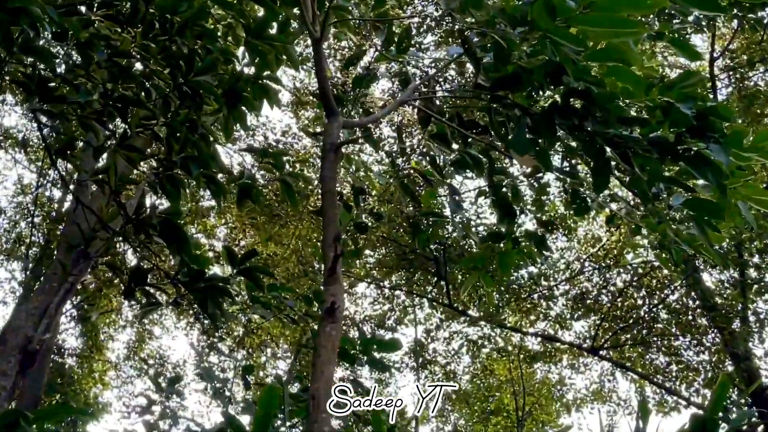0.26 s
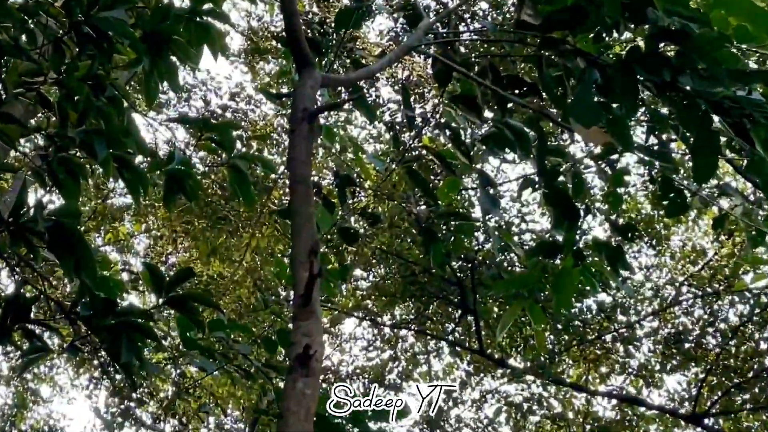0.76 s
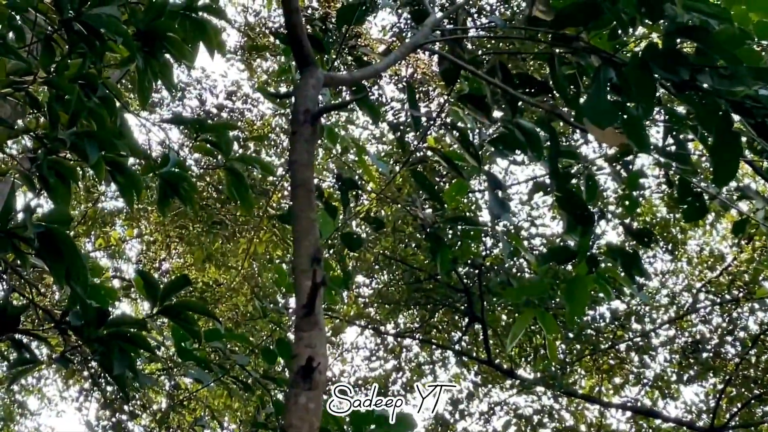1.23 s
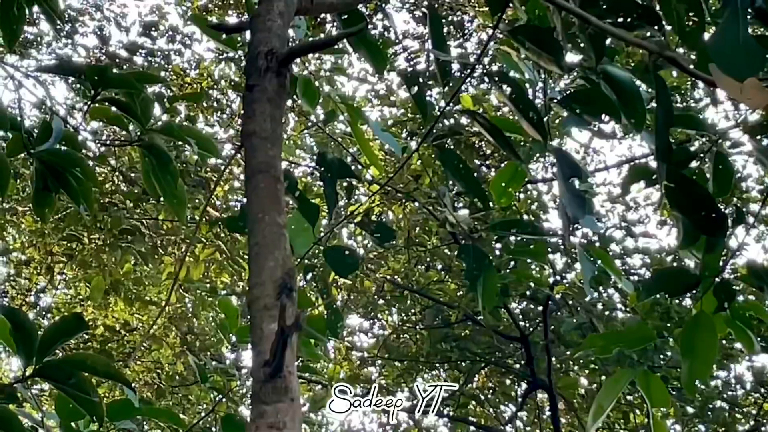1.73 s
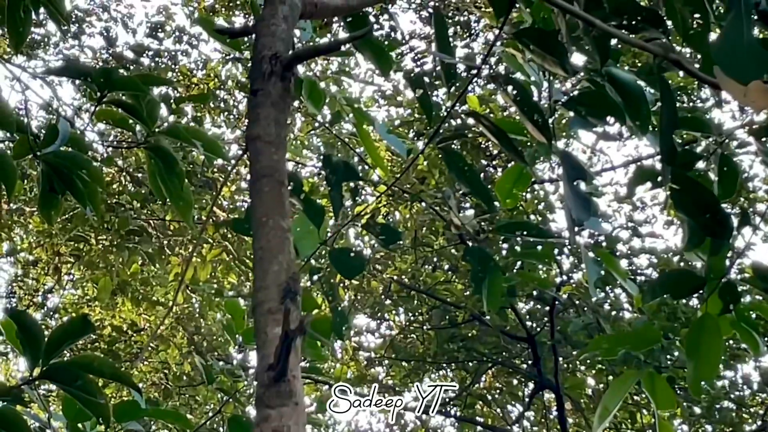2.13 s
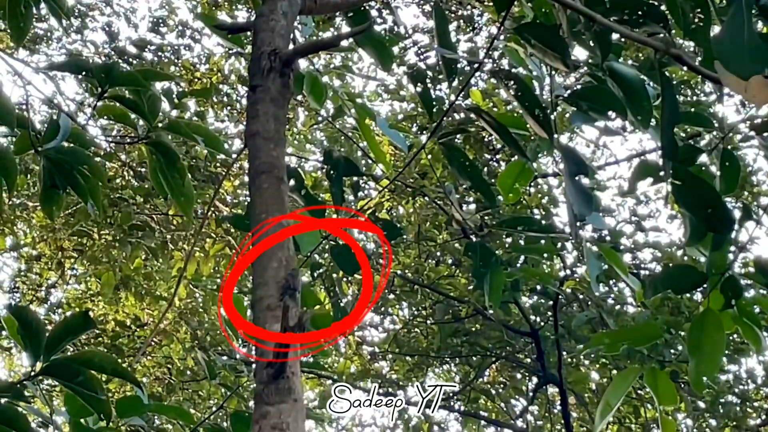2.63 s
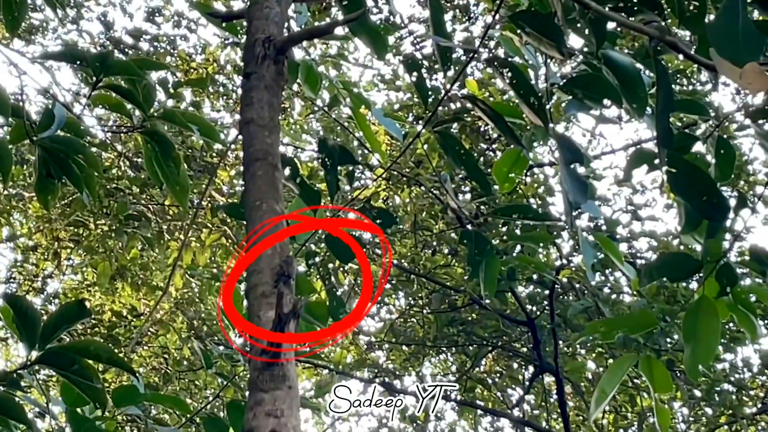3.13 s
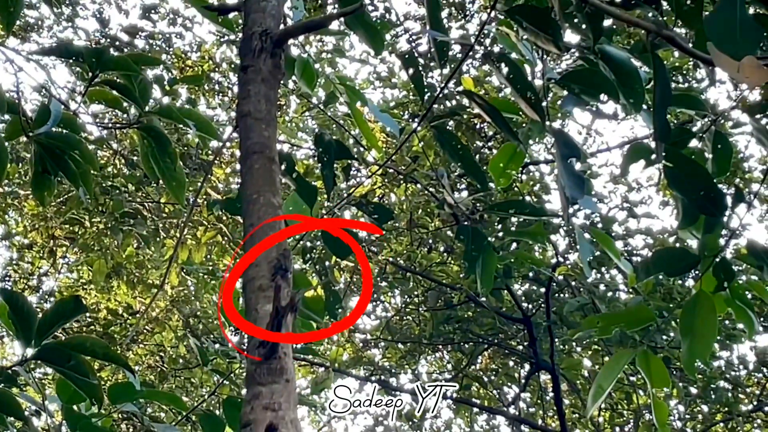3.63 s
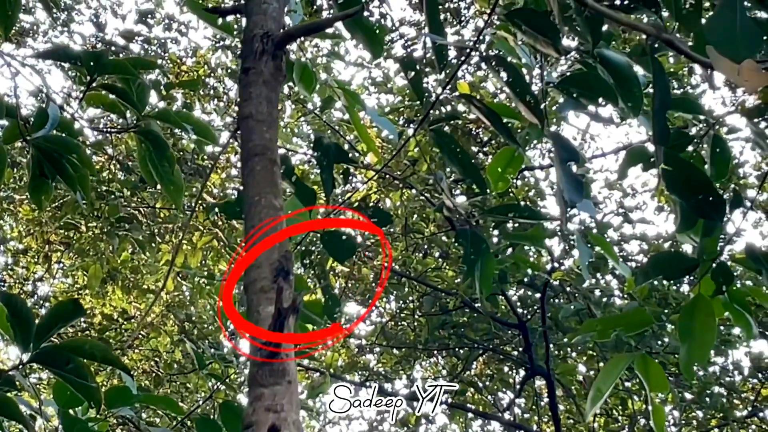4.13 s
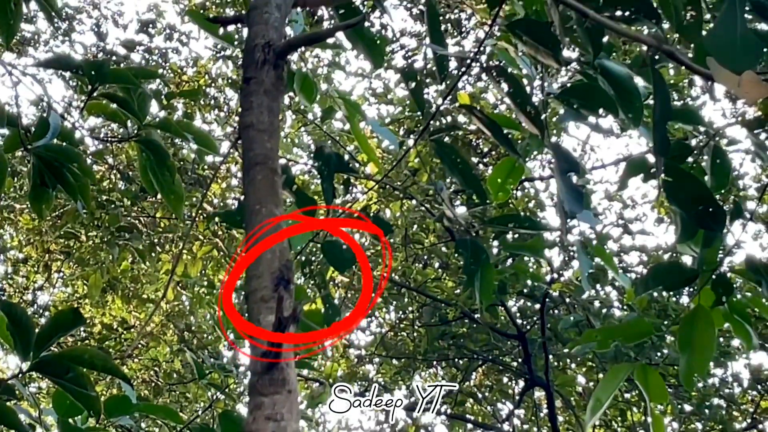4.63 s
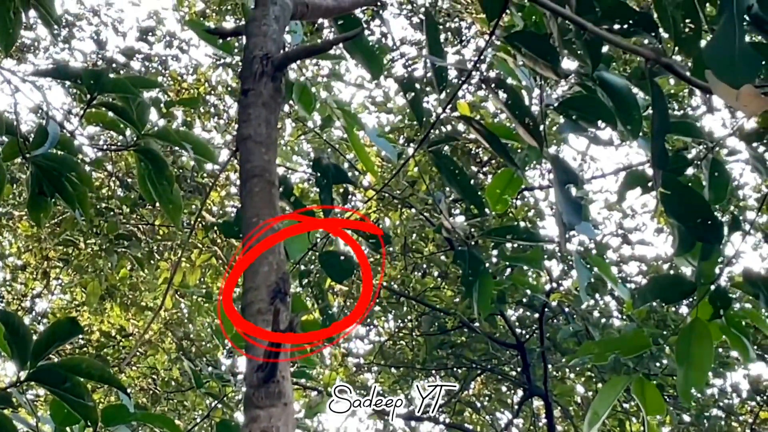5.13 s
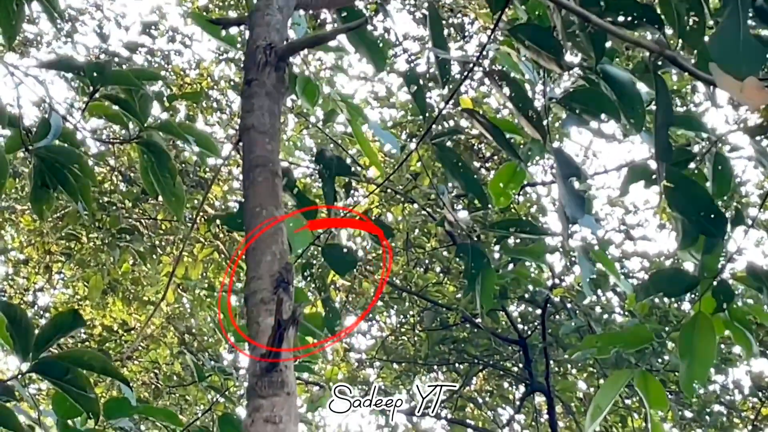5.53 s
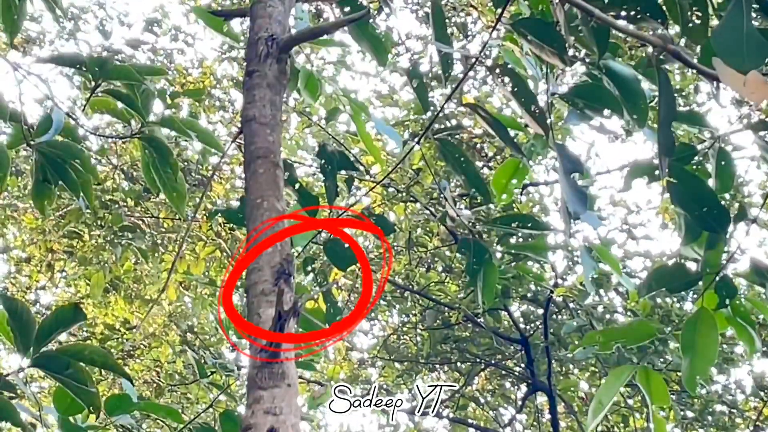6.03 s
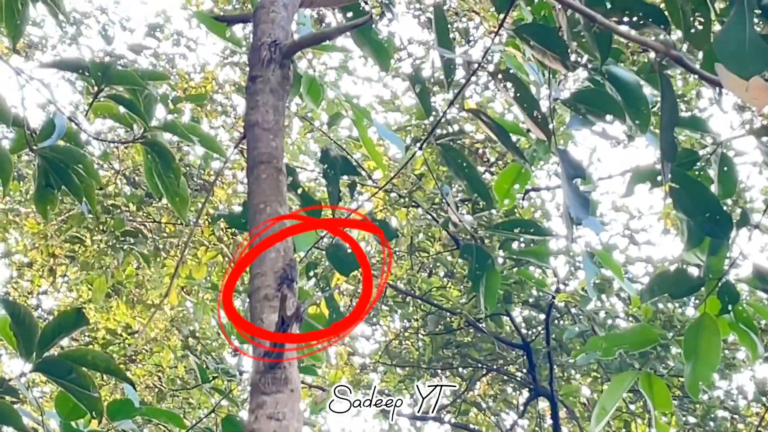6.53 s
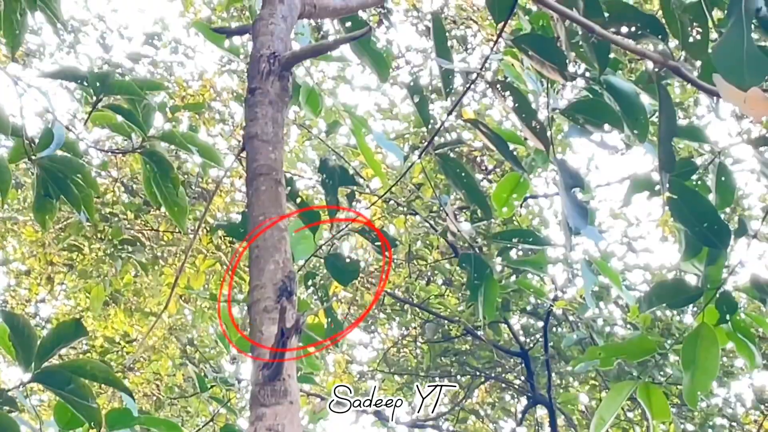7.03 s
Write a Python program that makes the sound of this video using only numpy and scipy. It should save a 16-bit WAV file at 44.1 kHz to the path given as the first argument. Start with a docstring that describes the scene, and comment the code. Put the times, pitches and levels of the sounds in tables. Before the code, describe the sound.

One cicada's high, rasping whine speeds up, sags into a fast flutter and tightens again, three times, over a very faint forest background.

```python
"""A shrill cicada buzz speeds up, then dips, throbs and slows, about every three seconds.
The insect sits on a forest trunk. Its tymbals (small drum skins) click about 500 times a second and
make its abdomen ring. In each dip the abdomen goes slack and pumps about 40 times a second.
Leaves and trunks scatter the song. Under it lie a faint forest rumble, a thin hiss, and the
handling noise and soft taps of fingers on a hand-held camera."""
import sys
import numpy as np
from scipy import signal
from scipy.fft import rfft, irfft, next_fast_len
from scipy.io import wavfile
from scipy.ndimage import map_coordinates

SR = 44100
rng = np.random.default_rng(int(sys.argv[2]) if len(sys.argv) > 2 else 0)


def wav_record(signal):
    """Record a signal, one row per channel, as 16-bit PCM in the file named by sys.argv[1]."""
    frames = np.transpose(np.atleast_2d(signal))
    bounded = np.clip(frames, -1, 1)
    # unit amplitude maps onto the largest positive 16-bit level
    quanta = np.round(bounded * 32767).astype(np.int16)
    wavfile.write(sys.argv[1], SR, quanta)


N = 320607

# when the abdomen goes slack and the song dips: (start [s], end [s])
DIPS = [(.818, 1.634), (3.775, 4.634), (6.769, 7.61)]
# slow rise and fall of the low background noise: (time [s], relative level [dB])
BACKGROUND_SWELL = [(0.0, -74.5), (0.99, -79), (1.29, -76.5), (2.61, -81), (3.26, -85.5), (3.91, -72.5),
                    (4.49, -72), (4.94, -70.5), (6.64, -76), (7.27, -69.5)]


def cicada():
    """The whole song in stereo: tymbal clicks ring the abdomen; leaves and trunks scatter the sound."""
    # scattered song that reaches left and right with opposite sign: (frequency [Hz], gain [dB])
    spread_spectrum = [(1000, -24), (2500, -102), (4000, -57), (4900, -42), (5450, -81), (6100, -31),
                       (6700, 25), (7200, 12.5), (9200, 11.5), (10500, -29), (12000, -27), (13000, 4.5),
                       (15600, 17.5)]
    dip, slack, slowing, throb_db, sizzle_gain = abdomen_motion()
    hurry, pace_hz = tymbal_pace()
    # a slack tymbal clicks more evenly than a taut one
    unevenness = (.0048 - .0028 * dip) * wobble(130)
    scatter_s = 120e-6 - 80e-6 * np.clip(slack, 0, 1)
    rate_hz = pace_hz * (1 - slowing + unevenness)
    clicks = tymbal_clicks(rate_hz, scatter_s, size_db=2.5)
    rasp = leaves(abdomen_rasp(clicks, slack), delay_ms=.7, band_hz=140)
    whine = abdomen_whine(rate_hz, abdomen_resonance(slack, dip, hurry), dip)
    whine_gain = amp(1.3 * dip - 5.5 * hurry)  # compared with the rasp
    song = rasp * amp(.45 * throb_db) + whine_gain * whine * amp(throb_db)
    song = leaves(song / np.hypot(1, whine_gain), delay_ms=.3, band_hz=81)
    mid = unit(song + amp(-9) * echoes(song, fade_s=0.7))  # farther trunks make the song linger
    side = amp(-15.5) * unit(ring(echoes(clicks, fade_s=0.14), spread_spectrum))
    # a little weaker when the clicks are fast, in a dip, and for the first two seconds
    level_db = -25 - 2.5 * hurry - 0.45 * dip - curve([(0, 0.5), (2, 0)])
    return amp(level_db) * np.array([mid + side, mid - side]) + tymbal_hiss(hurry, sizzle_gain)


def tymbal_pace():
    """The clicks speed up through each buzz and slow in its dip: gives hurry (0-1) and rate [Hz]."""
    slow_hz, fast_hz, buzz_s = 476, 563, 2.14
    falter_hz, falter_s = 6, .12  # the clicks falter as the abdomen tightens again
    t = np.arange(N) / SR
    hurry, falter = np.zeros((2, N))
    for start, end in DIPS:
        progress = np.clip(1 + (t - start) / buzz_s, 0, 1)
        rise = .38 * progress + .62 * progress ** 4.2  # a steady creep plus a late rush
        fall = np.clip((end - t) / (end - start), 0, 1) ** 1.55
        hurry += np.minimum(rise, fall)
        falter += np.exp(-((t - end) / falter_s) ** 2)
    return hurry, slow_hz + (fast_hz - slow_hz) * hurry - falter_hz * falter


def tymbal_clicks(rate_hz, scatter_s, size_db, half_width=8):
    """The tymbals buckle with one sharp click per cycle, each a little off in time and size."""
    cycles = np.cumsum(rate_hz) / SR
    position = np.interp(np.arange(1, int(cycles[-1])), cycles, np.arange(N))
    chance = rng.standard_normal((len(position), 2))
    position = position + chance[:, 0] * scatter_s[position.astype(int)] * SR
    # a short tapered pulse lets a click fall between two samples
    index = position.astype(int)[:, None] + np.arange(1 - half_width, half_width + 1)
    offset = index - position[:, None]
    taper = np.cos(np.pi * offset / (2 * half_width)) ** 2
    pulses = np.sinc(offset) * taper * amp(size_db * chance[:, 1:])
    return np.bincount(np.clip(index, 0, N - 1).ravel(), pulses.ravel(), N)


def abdomen_motion():
    """In each dip the abdomen lets go, pumps, then snaps taut: gives the curves that steer the song."""
    let_go_s, tighten_s, tighten_early_s = .064, .021, .031
    pump_hz, pump_rise_hz_per_s, rush_s = 39.8, 15.6, .393  # the pumps quicken for the last rush_s
    t = np.arange(N) / SR
    dip, slack, slowing, throb_db, sizzle_gain = np.zeros((5, N))
    for start, end in DIPS:
        progress = np.clip((t - start) / (end - start), 0, 1)
        let_go = 1 - np.exp(-np.maximum(t - start, 0) / let_go_s)
        tighten = .5 - .5 * np.tanh((t - end + tighten_early_s) / (2 * tighten_s))
        depth = let_go * tighten
        extra_turns = .5 * pump_rise_hz_per_s * np.maximum(t - end + rush_s, 0) ** 2
        turns = .314 + pump_hz * (t - start) + extra_turns
        angle = 2 * np.pi * (turns + .015 * wobble(30))
        # from the start of a dip to its end, the pulls get weaker and briefer
        sag = np.interp(progress, (0, 1), (1.09, .95))  # slack between pulls
        pull = np.interp(progress, (0, 1), (1.5, .5))
        briefness = np.interp(progress, (0, 1), (.95, 3.3))
        lopsided_angle = angle + .36 * np.cos(angle)  # tightens slowly, lets go fast
        stroke = (.5 - .5 * np.cos(lopsided_angle)) ** briefness
        dip += depth
        slack += depth * sag * (1 - pull * stroke)
        # each pump swings the click rate and the loudness, less so as the dip goes on
        slowing += depth * .08 * (1 - .93 * progress) * np.cos(angle - 2 * np.pi * .29 * progress)
        throb_db += depth * 5.8 * (1 - .65 * progress) * np.cos(angle - 2 * np.pi * .18)
        sizzle_gain += depth * amp(-49.5 - 20 * np.abs(progress - .72))  # loudest late in the dip
    return dip, slack, slowing, throb_db, sizzle_gain


def abdomen_rasp(clicks, slack):
    """Every click rings the abdomen, and the colour of that ring depends on how slack it is."""
    # ring of one click with the abdomen taut, half slack and slack: (frequency [Hz], gain [dB])
    taut_spectrum = [(900, -64), (2000, -52.5), (3100, -38.5), (3500, -31.5), (4000, -16), (4900, -8.5),
                     (5350, 1), (5750, 4), (6000, -2.5), (6500, -5.5), (7100, -50.5), (9600, -35),
                     (12000, -43.5), (14600, -46.5), (15600, -29)]
    half_spectrum = [(900, -61), (2000, -41.5), (3100, -34), (3900, -14.5), (4400, -4.5), (4750, -9),
                     (5300, 7), (6400, -7), (7100, -51.5), (9700, -27), (11500, -34), (12700, -27),
                     (14500, -50), (15600, -59)]
    slack_spectrum = [(900, -93), (2000, -51.5), (3100, -28.5), (3500, -17.5), (4000, -21.5), (4400, -5),
                      (4700, -13.5), (5500, 2.5), (6400, -5.5), (7100, -52.5), (9700, -29.5), (11500, -27),
                      (12700, -42), (14500, -51), (15600, -30)]
    taut = np.clip(1 - 2 * slack, 0, 1)
    loose = np.clip(2 * slack - 1, 0, 1)
    return unit(ring(clicks * taut, taut_spectrum)
                + ring(clicks * (1 - taut - loose), half_spectrum)
                + ring(clicks * loose, slack_spectrum))


def abdomen_resonance(slack, dip, hurry):
    """The pitch [Hz] at which the abdomen rings best: low when slack, high and fluttering when taut."""
    taut_hz, rise_hz, slack_hz = 5420, 200, 4340
    # the flutter gets slower and wider as the clicks hurry
    flutter_hz = np.interp(np.sqrt(hurry), (0, 1), (96.2, 77.2))
    phase = 2 * np.pi * np.cumsum(flutter_hz * (1 + 0.0283 * wobble(25))) / SR
    flick_hz = 75 * (1 + 2 * hurry) * (np.sin(phase) + .9 * np.sin(2 * phase))
    high_hz = taut_hz + (rise_hz * hurry + flick_hz) * (1 - dip ** 2)
    return high_hz + (slack_hz - high_hz) * slack


def abdomen_whine(rate_hz, centre_hz, dip):
    """Multiples of the click rate near the abdomen's resonance ring on as a clean, wavering tone."""
    width_hz = 440 + 120 * dip  # the taut abdomen rings more narrowly
    waver_hz = 70 - 42 * dip
    multiples = np.arange(7, 14)[:, None]
    detune = (multiples * rate_hz - centre_hz) / width_hz
    gain = 1 / (1 + detune ** 2) ** 2.7
    gain /= np.linalg.norm(gain, axis=0)
    lag = 1.6 * np.arctan(detune)  # the moving resonance bends each tone
    phase = multiples * 2 * np.pi * np.cumsum(rate_hz) / SR - lag
    waver = 2 * np.pi * np.cumsum(waver_hz * wobble(420)) / SR
    return unit(np.sum(gain * np.sin(phase + waver), axis=0))


def tymbal_hiss(hurry, sizzle_gain):
    """Leaves blur the highest part of the clicks into a hiss, with an added sizzle in each dip."""
    # upper ring of the tymbals: (frequency [Hz], gain [dB])
    overtone_spectrum = [(7000, -51), (8200, -10), (9000, 1.5), (9600, 1.5), (10400, 0), (11500, -10.5),
                         (12800, -10.5), (14500, -27), (15600, -12)]
    # sizzle of the slack tymbals: (frequency [Hz], gain [dB])
    sizzle_spectrum = [(7000, -50), (10500, -9), (11700, -2), (12700, 0), (13400, -2), (14500, -20),
                       (15600, -5)]
    noise = rng.standard_normal(N)
    overtone = amp(-52 - 3.5 * hurry ** 2) * unit(ring(noise, overtone_spectrum))
    return overtone + sizzle_gain * unit(ring(noise, sizzle_spectrum))


def leaves(x, delay_ms, band_hz):
    """Each narrow band of pitch finds its own path through the leaves; high ones are delayed most."""
    size = next_fast_len(N + SR // 2)
    hz = np.fft.rfftfreq(size, 1 / SR)
    paths = map_coordinates(rng.standard_normal(2048), [hz / band_hz], mode="mirror")
    delay_s = delay_ms / 1000 * paths ** 2 * (hz / 5500) ** 3
    phase = 2 * np.pi * np.cumsum(delay_s) * SR / size
    return irfft(rfft(x, size) * np.exp(-1j * phase), size)[:N]


def echoes(x, fade_s):
    """The forest sends back a dense cloud of echoes that fades at 60 dB per fade_s."""
    t = np.arange(SR // 2) / SR
    tail = rng.standard_normal(len(t)) * amp(-60 * t / fade_s)
    return signal.oaconvolve(x, tail / np.linalg.norm(tail))[:N]


def finger_taps():
    """Soft touches ring the camera case for a few cycles; some, mostly faint ones, add a bright click."""
    # finger touches: (time [s], relative level [dB], share of the bright click [0-1])
    touches = [(1.15, -65, 0.94), (1.186, -47.5, 0.38), (1.988, -62.5, 1), (2.007, -62, 0.56),
               (2.406, -56, 0.098), (3.457, -63.5, 0.38), (3.523, -64, 0.28), (4.43, -56, 0.97),
               (4.5, -53, .1), (4.881, -46.5, 0.09)]
    # tones of the case: (frequency [Hz], relative level [dB], time to fade by 60 dB [s])
    case_tones = [(723, 10.5, 0.0084), (584, 1, 0.0074), (200, -26, 0.03)]
    click_hz, click_fade_s = 1350, 0.0059
    t = np.arange(SR // 20) / SR
    # the two microphones sit at different places on the case and feel it ring out of step
    shift = .35 * np.array([[1], [-1]])
    knock = sum(amp(db - 60 * t / fade_s) * np.sin(2 * np.pi * hz * t + shift)
                for hz, db, fade_s in case_tones)
    knock *= (1 - np.exp(-t / 0.0031)) ** 2  # soft start
    knock /= np.abs(knock).max()
    click = np.sin(2 * np.pi * click_hz * t + 2 * shift) * amp(-60 * t / click_fade_s)
    click *= (1 - np.exp(-t / 0.00086)) ** 2
    click /= np.abs(click).max()
    taps = np.zeros((2, N))
    for time_s, db, bright in touches:
        start = round(time_s * SR)
        taps[:, start:start + len(t)] += amp(db) * (knock + bright * click)
    return taps


def forest_rumble():
    """A low forest rumble swells and fades slowly, with a quick flicker in its level."""
    # colour of the rumble: (frequency [Hz], gain [dB])
    spectrum = [(35, -32), (60, -2.5), (219, 1.5), (376, -1.5), (440, -0.5), (507, -2), (1300, -11.5),
                (1800, -11), (2340, -31), (3960, -120)]
    return amp(curve(BACKGROUND_SWELL) + wobble(18) + 1.5) * stereo_noise(spectrum, side_db=-5.5)


def handling_noise():
    """The hand on the camera makes a deep, lumpy noise, with a bump whenever the grip shifts."""
    # colour of the hand's noise: (frequency [Hz], gain [dB])
    spectrum = [(15, -25), (35, -3), (65, 2), (110, -0.5), (250, -62), (1000, -75)]
    # shifts of the grip: (time [s], level [dB])
    grip_shifts = [(1.19, -76), (4.46, -72), (4.92, -72), (5.14, -70), (7.03, -71)]
    t = np.arange(N) / SR
    bumps = sum(amp(db) * np.exp(-((t - time_s) / 0.033) ** 2) for time_s, db in grip_shifts)
    swell_db = curve(BACKGROUND_SWELL)
    level_db = -86.5 + 1.6 * (swell_db - swell_db.mean()) + 3.0 * wobble(8.1)
    return (amp(level_db) + bumps) * stereo_noise(spectrum, side_db=-25)


def forest_hiss():
    """The distant forest adds a thin, steady hiss."""
    # colour of the hiss: (frequency [Hz], gain [dB])
    spectrum = [(300, -7.5), (900, 9), (1650, 6.5), (1950, 15), (2300, 14.5), (2900, -5), (5000, -4.5)]
    return amp(-76) * stereo_noise(spectrum, side_db=-7)


def stereo_noise(spectrum, side_db):
    """Coloured noise, mostly alike in both ears; side_db sets how much left and right differ."""
    mid, side = (unit(ring(noise, spectrum)) for noise in rng.standard_normal((2, N)))
    return np.array([mid + amp(side_db) * side, mid - amp(side_db) * side])


def ring(x, spectrum, size=4096):
    """Pass x through a ringing body described by rows of (frequency [Hz], gain [dB])."""
    hz, db = np.transpose(spectrum)
    log_hz = np.log(np.fft.rfftfreq(size, 1 / SR) + 1)
    gain = amp(np.interp(log_hz, np.log(hz), db))
    # fold the filter so that it rings only after a sound, never before it
    cepstrum = irfft(np.log(gain))
    cepstrum[1:size // 2] *= 2
    cepstrum[size // 2 + 1:] = 0
    response = irfft(np.exp(rfft(cepstrum)))
    return signal.oaconvolve(x, response)[:N]


def amp(db):
    """Turn decibels into a gain."""
    return 10 ** (np.asarray(db) / 20)


def unit(x):
    """Scale to an average strength (rms) of 1."""
    return x / np.sqrt(np.mean(x ** 2) + 1e-20)


def curve(rows):
    """Join rows of (time [s], value) with straight lines, one value per sample."""
    return np.interp(np.arange(N) / SR, *np.transpose(rows))


def wobble(rate):
    """A smooth curve through `rate` random values a second."""
    points = rng.standard_normal(int(N * rate / SR) + 4)
    return map_coordinates(points, [np.arange(N) * rate / SR])


def scene():
    """The cicada over the quiet forest and the small sounds of the hand."""
    return cicada() + forest_rumble() + handling_noise() + forest_hiss() + amp(6.5) * finger_taps()


def record(dry):
    """The camera keeps nothing above its highest frequency."""
    top_hz = 15800
    size = next_fast_len(N + SR // 2)
    kept = np.fft.rfftfreq(size, 1 / SR) < top_hz
    return irfft(rfft(dry, size) * kept, size)[:, :N]


dry = scene()
out = record(dry)
wav_record(out)
```